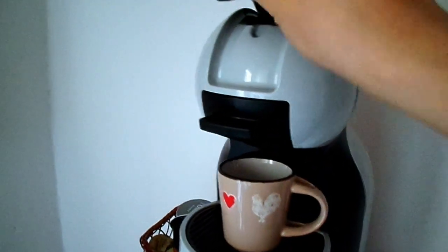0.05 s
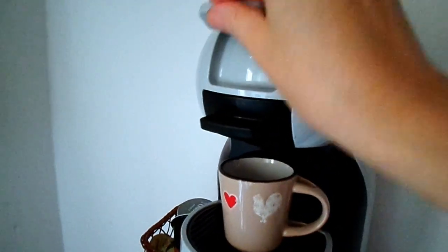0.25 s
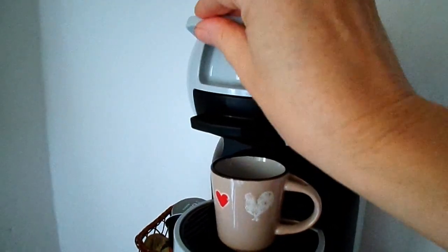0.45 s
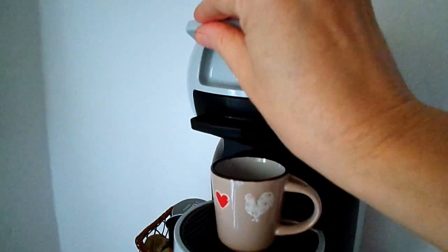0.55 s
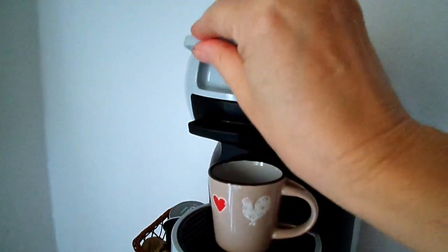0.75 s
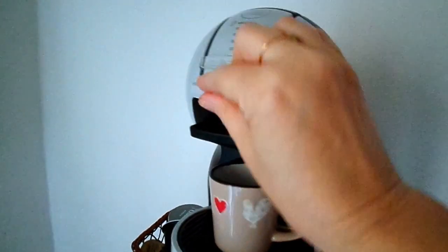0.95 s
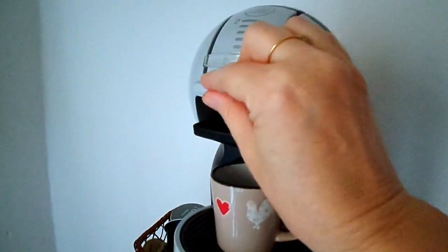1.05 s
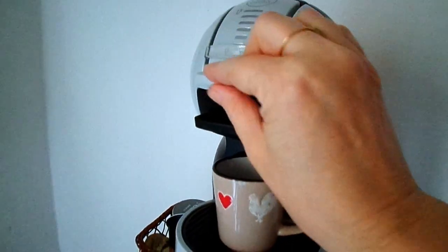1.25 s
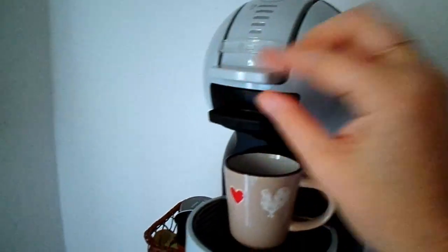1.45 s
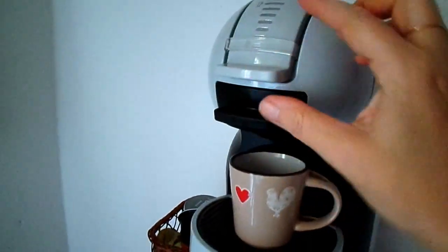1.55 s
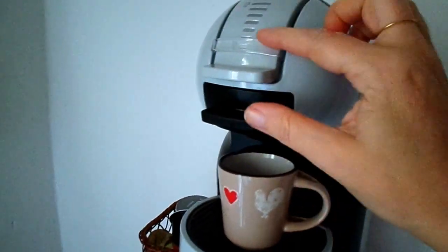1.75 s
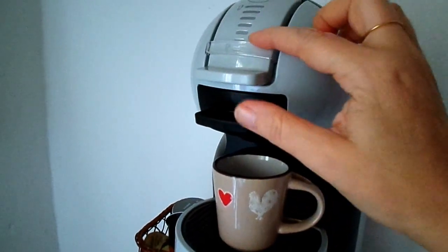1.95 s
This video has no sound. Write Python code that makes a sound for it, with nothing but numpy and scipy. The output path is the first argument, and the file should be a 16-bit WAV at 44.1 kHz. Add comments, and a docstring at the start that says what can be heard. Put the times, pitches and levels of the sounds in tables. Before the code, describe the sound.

Sharp clacks and light ticks of a capsule coffee machine lever closing in a small room.

```python
"""The lever of a plastic capsule coffee machine clacks free, ticks and knocks along its travel, then
latches with a double clack, a short rattle and a hum of the housing. The fingers let go with a last snap.
Each clack is an impact: a broadband crack followed by the free vibration of the body's damped modes.
A small, hard-walled room reverberates, skin rubs on the plastic, and the near microphone overloads."""
import sys
import numpy as np
from scipy import signal
from scipy.fft import rfft, irfft
from scipy.io import wavfile
from scipy.ndimage import uniform_filter1d

SR = 44100
rng = np.random.default_rng(int(sys.argv[2]) if len(sys.argv) > 2 else 0)


def bounce(signal):
    """Save signal as a 16-bit WAV file at the path given by the first command-line argument."""
    frames = np.transpose(np.atleast_2d(signal))
    limited = np.clip(frames, -1, 1)
    pcm = np.round(limited * 32767).astype(np.int16)
    wavfile.write(sys.argv[1], SR, pcm)


N = 88200
T = np.arange(N) / SR

# Spectrum of the latch's cracks and rattle. Each row: frequency in Hz, gain in dB.
LATCH_SPECTRUM = [(170, 5.5), (290, 22.5), (430, 15), (660, 23), (1050, 15.5), (1600, 11.5), (2200, 15),
                  (3600, 11), (4800, 10.5), (6500, 6.5), (9300, 12), (12000, 5.5), (15500, 1)]


def from_db(db):
    """Amplitude grows tenfold for every 20 dB."""
    return 10 ** (np.asarray(db) / 20)


def envelope(points):
    """Gain over time, linear in decibels between (s, dB) points."""
    return from_db(np.interp(T, *np.transpose(points)))


def at_hz(points, hz):
    """Interpolation on a logarithmic frequency axis."""
    frequencies, values = np.transpose(points)
    return np.interp(np.log(hz + 1e-9), np.log(frequencies), values)


def colour(x, spectrum):
    """Minimum-phase filtering: folding the cepstrum makes the (Hz, dB) response causal."""
    hz = np.arange(N + 1) * SR / (2 * N)
    cepstrum = irfft(np.log(from_db(at_hz(spectrum, hz))))
    cepstrum[1:N] *= 2
    cepstrum[N + 1:] = 0
    return irfft(rfft(x, 2 * N) * np.exp(rfft(cepstrum)))[:N]


def noise(spectrum):
    """Stationary filtered noise of unit rms."""
    x = colour(rng.standard_normal(N), spectrum)
    return x / np.sqrt(np.mean(x ** 2) + 1e-20)


def decay(start, t60):
    """Exponential damping: a fall of 60 dB every t60 seconds from the start."""
    return (T >= start) * np.exp(-np.log(1000) * np.clip((T - start) / t60, 0, 10))


def tone(start, hz, waver, waver_per_s=60):
    """Random modulation: a sine starts clean, then wavers in amplitude and phase."""
    knots = rng.standard_normal((2, 512))
    in_phase, quadrature = (np.interp(T * waver_per_s, np.arange(len(k)), k) for k in knots)
    age = np.maximum(T - start, 0)
    depth = waver * (1 - np.exp(-age * waver_per_s / 2))
    phase = 2 * np.pi * hz * age
    return (1 + depth * in_phase) * np.sin(phase) + depth * quadrature * np.cos(phase)


def ring(start, db, modes):
    """Free vibration after a blow: a sum of damped modes of alternating sign."""
    return sum((-1) ** k * from_db(db + mode_db) * decay(start, t60) * tone(start, hz, waver=0.42)
               for k, (hz, mode_db, t60) in enumerate(modes))


def crack(start, t60):
    """The dense modes of struck plastic merge into a damped noise burst of unit energy."""
    damping = decay(0, t60)[:8192]
    burst = rng.standard_normal(len(damping)) * damping
    for _ in range(2):  # flatten the spectrum, then restore the decay
        spectrum = rfft(burst)
        flat = irfft(spectrum / (np.abs(spectrum) + 1e-12))
        local_rms = np.sqrt(np.abs(uniform_filter1d(flat ** 2, size=64)) + 1e-20)
        burst = flat * damping / local_rms
    burst /= np.sqrt(np.sum(burst ** 2))
    return np.pad(burst, (int(start * SR), N))[:N]


def impact(hits, spectrum, modes):
    """Impact excitation: every contact cracks, and the hardest sets the body ringing."""
    cracks = sum(from_db(db) * crack(start, t60) for start, db, t60 in hits)
    hardest_start, hardest_db, _ = max(hits, key=lambda hit: hit[1])
    return colour(cracks, spectrum), ring(hardest_start, hardest_db, modes)


def room_response(gap_s=0.0039, build_s=0.005):
    """Reverberation: a diffuse tail of unit energy, each band dying at its own rate."""
    # Each row: frequency in Hz, reverberation time in seconds.
    reverb_times = [(150, 0.72), (300, 0.3), (800, 0.58), (5000, 0.45), (9500, 0.3), (13000, 0.18)]
    edges = np.geomspace(90, 18000, 25)
    hz = np.arange(N // 2 + 1) * SR / N
    white = rfft(rng.standard_normal(N))
    tail = 0
    for low, high in zip(edges, edges[1:]):
        band = irfft(white * (hz >= low) * (hz < high))
        tail = tail + band * decay(gap_s, at_hz(reverb_times, np.sqrt(low * high)))
    spectrum = rfft(tail)
    smooth_magnitude = np.sqrt(uniform_filter1d(np.abs(spectrum) ** 2, size=60) + 1e-9)
    tail = irfft(spectrum / smooth_magnitude * (hz > edges[0]) * (hz < edges[-1]))
    tail *= (1 - np.exp(-T / build_s)) * (T < 1)
    return tail / np.sqrt(np.sum(tail ** 2))


def room_tone():
    """Ambient noise: steady, and strongest at low frequencies."""
    # Each row: frequency in Hz, relative level in dB.
    air_spectrum = [(35, -20.5), (60, -11.5), (206, -24), (443, -8), (931, -15.5), (1520, -20), (3200, -24),
                    (4320, -34.5), (15500, -39.5)]
    return from_db(-55) * noise(air_spectrum)


def handling():
    """Friction of skin on plastic gives broadband noise; handling adds a low rumble."""
    # Envelopes. Each row: time in seconds, level in dB.
    rub_levels = [(0, -50), (0.06, -39.5), (0.13, -46), (0.25, -38.5), (0.62, -62), (0.66, -48.5),
                  (0.8, -60.5), (0.9, -46.5), (1.3, -57.5), (1.68, -49), (1.8, -46), (2, -55)]
    rumble_levels = [(0, -41.5), (0.19, -45), (0.28, -55.5), (1.3, -51.5), (1.7, -47), (1.82, -43.5),
                     (2, -48.5)]
    # Spectra. Each row: frequency in Hz, relative level in dB.
    rub_spectrum = [(185, 1.5), (270, 13.5), (700, 5.5), (1500, 1), (3500, -8.5), (15500, -17.5)]
    rumble_spectrum = [(20, -35), (35, -5), (47, 2.5), (65, -14.5), (130, -16), (400, -40)]
    rumble = signal.sosfilt(signal.butter(2, 400, fs=SR, output="sos"), noise(rumble_spectrum))
    return envelope(rub_levels) * noise(rub_spectrum) + envelope(rumble_levels) * rumble


def housing_hum(start=0.99, swell_s=0.072):
    """A low resonance of the housing swells and decays after the lever latches."""
    swell = 1 - np.exp(-np.maximum(T - start, 0) / swell_s)
    return from_db(-25.5) * swell * decay(start, t60=0.74) * tone(start, hz=242.6, waver=0.2)


def hinge():
    """Stick-slip: short bursts of slip excite hollow modes, and the hinge thuds once under load."""
    # Each row: start in seconds, level in dB.
    slips = [(0.199, -32), (0.596, -46.5), (0.642, -37), (0.771, -36.5), (0.907, -40)]
    # Hinge modes. Each row: frequency in Hz, relative level in dB, T60 in seconds.
    knock_modes = [(772, 6, 0.069), (1110, -0.5, 0.057), (900, -2.5, 0.028)]
    thud_modes = [(248, -10, 0.16), (375, -9.5, 0.087)]
    knocks = sum(ring(start, db, knock_modes) for start, db in slips)
    thud = ring(start=0.597, db=-32.5, modes=thud_modes)
    return thud + signal.fftconvolve(knocks, crack(0, t60=0.015))[:N]


def shell(x, bypass_db=-9.5):
    """The hollow shell acts as parallel resonators; part of each contact passes unfiltered."""
    # Each row: resonance frequency in Hz, gain in dB.
    resonances = [(1470, 12.5), (2080, -3.5), (3450, -4), (4700, -19.5), (6600, -8.5)]
    resonant = sum(from_db(db) * signal.lfilter(*signal.iirpeak(hz, Q=8, fs=SR), x)
                   for hz, db in resonances)
    return from_db(bypass_db) * x + resonant


def ticks():
    """Light impacts of lever and fingernails, each with its own spectrum, excite the shell."""
    # Each row: start in seconds, a gain in dB for each of the four bands, T60 in seconds.
    contacts = [(0.0349, -29, -4.5, -5, -43, 0.063), (0.0494, -14.5, -6, -1.5, 0, 0.041),
                (0.1429, -49, 0, 0.5, -26.5, 0.013), (0.1535, -72, -6, -11, -43, 0.012),
                (0.1765, -8, -1, -16, -12, 0.024), (0.189, 0, 2, 1, -21, 0.036),
                (0.531, -25, -6, -10, -20, 0.026), (0.6417, -25.5, -16, -17, -18, 0.053),
                (0.7263, -57, -8.5, -8, -36, 0.0091), (0.74, -55, -11.5, -17, -72, 0.014),
                (0.9022, -38, -33, -7.5, -10.5, 0.18), (1.3554, -54, -7, -4, -22, 0.0062),
                (1.4007, -6.5, -7.5, -5.5, -11.5, 0.065), (1.573, -81, -7, -14.5, -66, 0.0094)]
    # The four band frequencies in Hz.
    band_hz = [1100, 1900, 3900, 7500]
    excitation = 0
    for start, *band_db, t60 in contacts:
        spectrum = [(200, band_db[0] - 14), *zip(band_hz, band_db), (16000, band_db[-1] - 3)]
        excitation = excitation + colour(crack(start, t60), spectrum)
    return shell(excitation)


def rattle(touches_per_s=3500, dull_hz=10400):
    """Random collisions of loose parts follow the latch and lose treble as the parts settle."""
    # Each row: time in seconds, collision strength in dB.
    strengths = [(0.94, -22), (0.958, -30), (0.98, -24), (1.012, -39.5), (1.045, -29.5), (1.11, -48.5)]
    start, end = strengths[0][0], strengths[-1][0]
    touches = (rng.random(N) < touches_per_s / SR) * rng.choice([-1, 1], N)
    touches = touches * envelope(strengths) * (T > start) * (T < end)
    chatter = colour(signal.fftconvolve(touches, crack(0, t60=0.0075))[:N], LATCH_SPECTRUM)
    dull = signal.sosfiltfilt(signal.butter(4, dull_hz, fs=SR, output="sos"), chatter)
    return dull + decay(start, t60=0.29) * (chatter - dull)


def finger_snap():
    """A single impact excites heavily damped modes as the fingers let go."""
    # The one row: start in seconds, level in dB, T60 of the crack in seconds.
    hits = [(1.7389, -8.5, 0.017)]
    # Crack spectrum. Each row: frequency in Hz, gain in dB.
    spectrum = [(150, 1), (350, 10), (900, 13.5), (2150, 10.5), (2600, 22), (3750, 14.5), (4250, 7.5),
                (5500, 11), (7500, -1.5), (9500, 2), (15500, -11)]
    # Body modes. Each row: frequency in Hz, relative level in dB, T60 in seconds.
    modes = [(1407, -20.5, 0.051), (2750, -10, 0.0062), (3740, -8.5, 0.012)]
    return impact(hits, spectrum, modes)


def lever_latch():
    """Impacts milliseconds apart make a double clack as the lever latches; a lighter one follows."""
    # Each row: start in seconds, level in dB, T60 of the crack in seconds.
    hits = [(0.9265, -4, 0.012), (0.9278, -14, 0.034), (0.9328, -1.5, 0.0087), (0.9343, 1, 0.019),
            (0.9425, -14, 0.019), (1.0345, -10, 0.1)]
    # Body modes. Each row: frequency in Hz, relative level in dB, T60 in seconds.
    modes = [(283.6, -21.5, 0.2), (606, -27.5, 0.33), (775, -15, 0.028), (852, -19.5, 0.063),
             (1394, -26.5, 0.12), (3007, -15.5, 0.029), (3690, -10, 0.021), (4314, -41, 0.79),
             (9700, -23, 0.034)]
    return impact(hits, LATCH_SPECTRUM, modes)


def lever_release():
    """Three impacts in quick succession fuse into one loud clack as the lever snaps free."""
    # Each row: start in seconds, level in dB, T60 of the crack in seconds.
    hits = [(0.2060, 4, 0.01), (0.2085, -8, 0.041), (0.2172, -10.5, 0.13)]
    # Crack spectrum. Each row: frequency in Hz, gain in dB.
    spectrum = [(150, 8.5), (290, 22.5), (420, 12), (640, 26), (1000, 20), (1500, 29.5), (2400, 26),
                (3200, 15), (5500, 10.5), (7000, 16.5), (10800, 13.5), (15500, 1.5)]
    # Body modes. Each row: frequency in Hz, relative level in dB, T60 in seconds.
    modes = [(277, -22, 0.075), (292.7, -30, 0.33), (597, -18.5, 0.088), (741, -36, 0.55),
             (1490, -16.5, 0.072), (1590, -10, 0.038), (2284, -20.5, 0.066), (3990, -14.5, 0.028),
             (6260, -15, 0.031), (7370, -45, 0.35), (7470, -46, 0.39)]
    return impact(hits, spectrum, modes)


def scene():
    """Direct and reverberant sound superpose; body ringing, hum and background stay dry."""
    release_crack, release_ring = lever_release()
    latch_crack, latch_ring = lever_latch()
    snap_crack, snap_ring = finger_snap()
    # Each pair: a source, its reverberation in dB relative to its direct sound.
    sources = [(release_crack, -13.5), (latch_crack + rattle(), -7), (snap_crack, -9),
               (ticks(), -11.5), (hinge(), -5)]
    direct = sum(source for source, _ in sources) + release_ring + latch_ring + snap_ring
    into_room = sum(from_db(wet_db) * source for source, wet_db in sources)
    reverberation = signal.fftconvolve(into_room, room_response())[:N]
    return (direct + reverberation + housing_hum() + handling() + room_tone())[None]


def record(dry):
    """Saturation: the overloaded microphone flattens peaks, between two low-pass filters."""
    ceiling, cutoff_hz = 0.74, 15850
    low_pass = signal.ellip(10, 0.2, 70, cutoff_hz, fs=SR, output="sos")
    picked_up = signal.sosfilt(low_pass, dry)
    clipped = picked_up / (1 + (picked_up / ceiling) ** 4) ** (1 / 4)
    return signal.sosfilt(low_pass, clipped)


dry = scene()
out = record(dry)
bounce(out)
```